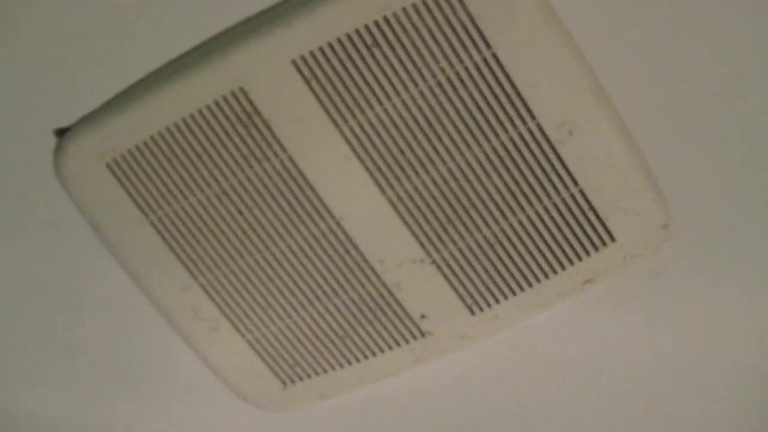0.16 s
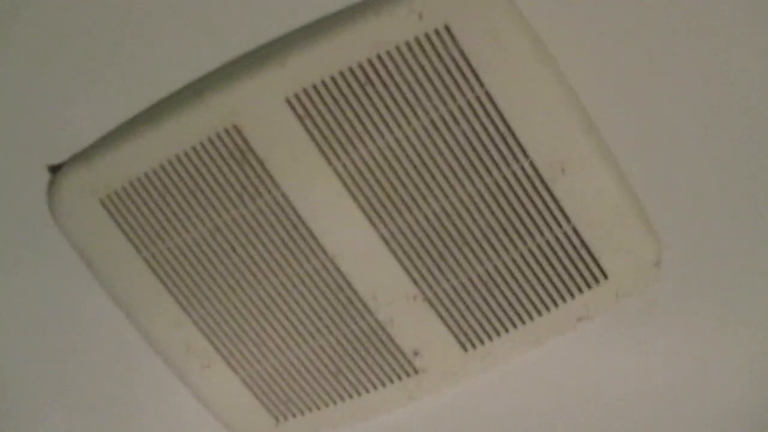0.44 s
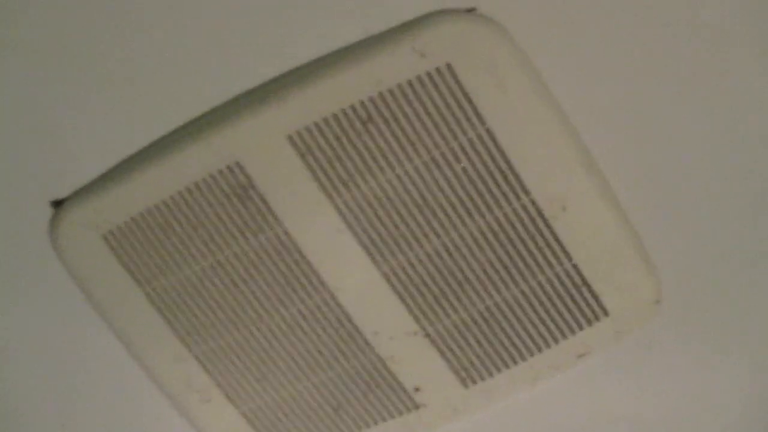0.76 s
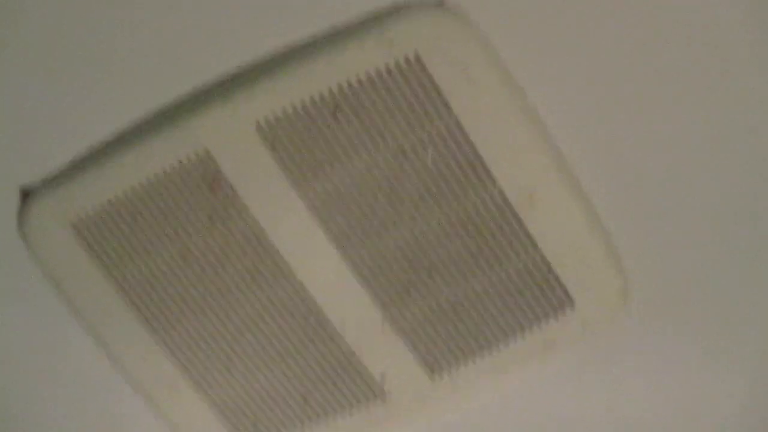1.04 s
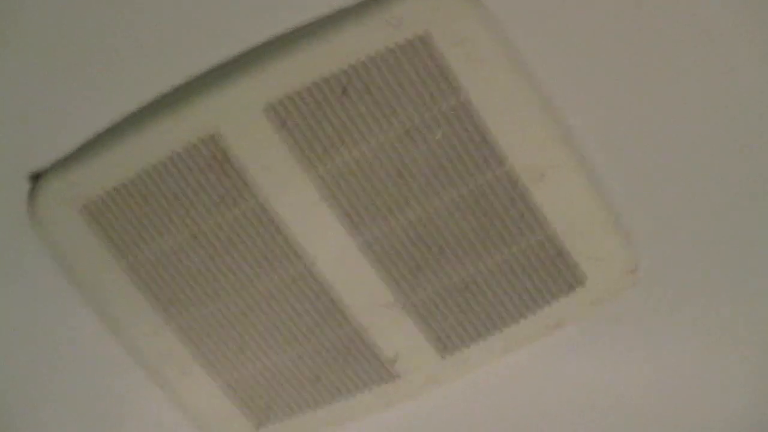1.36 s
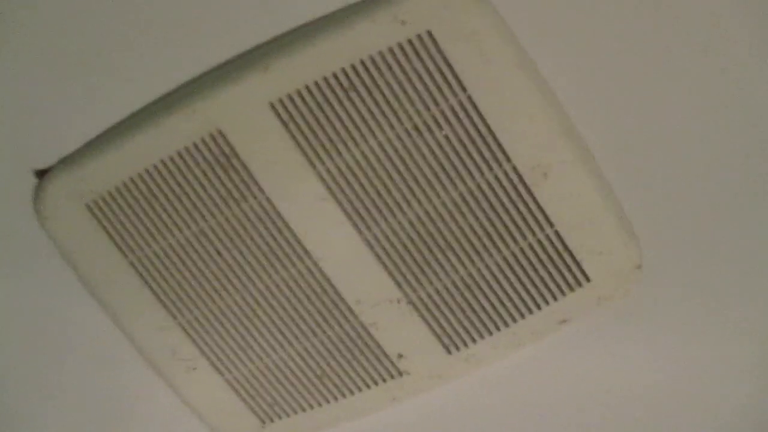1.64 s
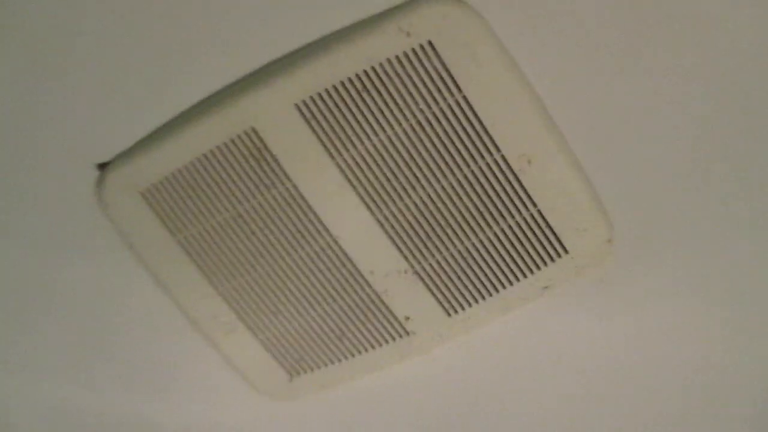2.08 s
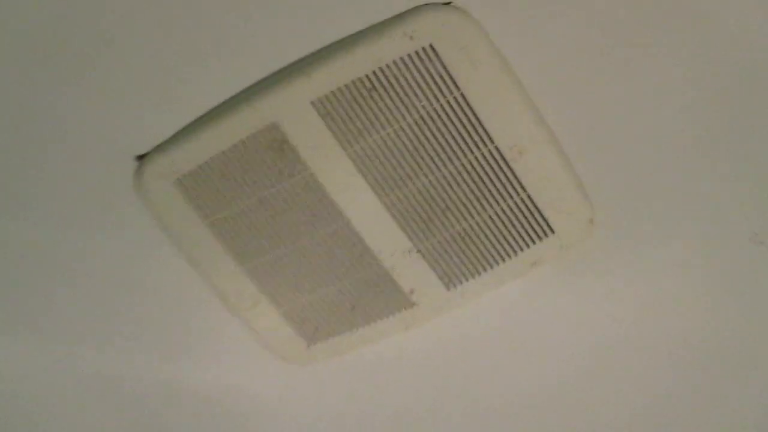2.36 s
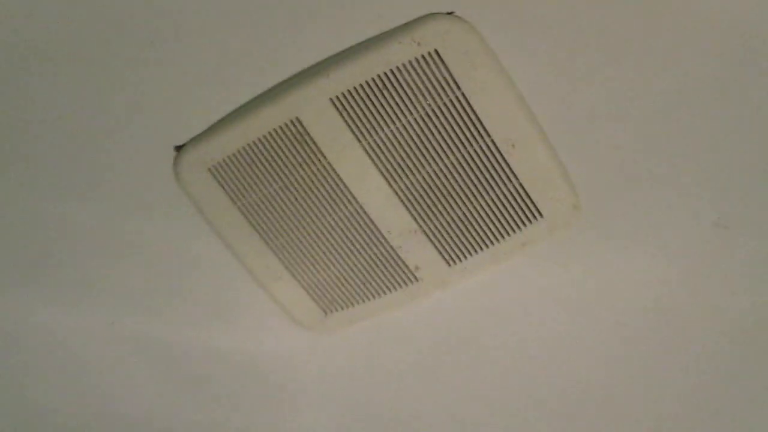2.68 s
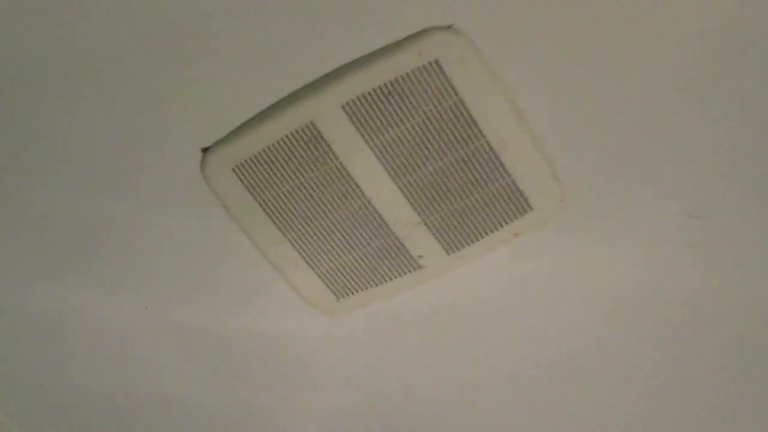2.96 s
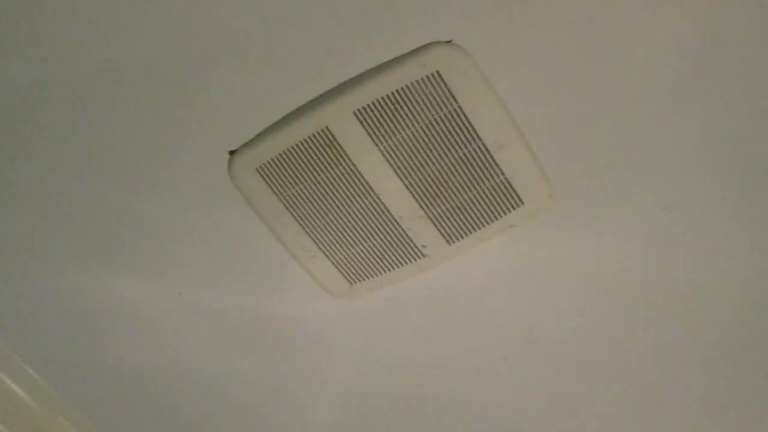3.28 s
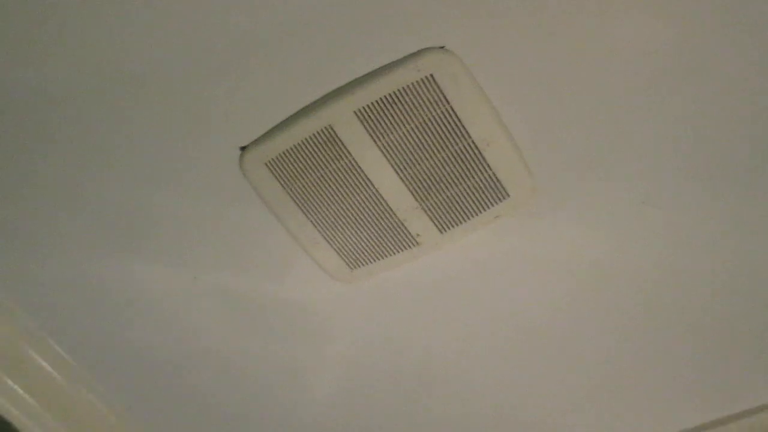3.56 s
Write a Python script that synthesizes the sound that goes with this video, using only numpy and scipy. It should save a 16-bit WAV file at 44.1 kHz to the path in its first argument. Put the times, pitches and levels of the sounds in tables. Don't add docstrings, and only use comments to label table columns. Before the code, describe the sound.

Constant motor hum with a buzzing housing and turbulent air through a grille, heard on a handheld camera; a loud close click early on, small grip ticks, then slightly duller air as the hand shifts.

```python
import sys
import numpy as np
from scipy import signal
from scipy.fft import rfft, irfft, next_fast_len
from scipy.io import wavfile
from scipy.ndimage import uniform_filter1d, map_coordinates

SR = 44100
rng = np.random.default_rng(int(sys.argv[2]) if len(sys.argv) > 2 else 0)


def invert_db(level):
    return 10 ** (np.asarray(level, dtype=float) / 20)


def pcm_store(signal):
    levels = np.round(np.clip(np.atleast_2d(signal), -1, 1) * 32767)
    wavfile.write(sys.argv[1], SR, levels.astype(np.int16).T)


N = 164052


def unit(x):
    return x / np.sqrt(np.mean(x ** 2) + 1e-20)


def along(points, hz):
    f, v = np.transpose(points)
    return np.interp(np.log(hz + 1), np.log(f + 1), v)


def lifts(peaks, hz):
    return sum(db / (1 + (2 * (hz - centre) / width) ** 2) for centre, width, db in peaks)


def wobble(rate):
    knots = rng.standard_normal(int(N * rate / SR) + 4)
    return map_coordinates(knots, [np.arange(N) * rate / SR])


def filtered(x, response):
    m = next_fast_len(N + SR // 2)
    return irfft(rfft(x, m) * response(np.fft.rfftfreq(m, 1 / SR)), m)[..., :N]


def band(centre_hz, spread):
    def bell(hz):
        return np.exp(-(np.log2((hz + 1) / centre_hz) / spread) ** 2)
    return unit(filtered(rng.standard_normal(N), bell))


def patchy(x, db, size, across, along_time):
    z = signal.stft(x, nperseg=size)[2]
    field = uniform_filter1d(rng.standard_normal(z.shape), size=across, axis=0)
    field = uniform_filter1d(field, size=along_time, axis=1)
    return signal.istft(z * invert_db(db * unit(field)), nperseg=size)[1][:N]


# frequency in Hz, density in dB per Hz.
AIR_SPECTRUM = [(45, -22), (70, -6.5), (200, -4), (700, -4.5), (1500, -16), (2700, -26.5), (8000, -32.5),
                (13500, -40.5), (15700, -49)]
# centre in Hz, width in Hz, lift in dB.
DUCT_RESONANCES = [(386, 10, 9.5), (535, 17.4, 6), (603, 24, -6), (712, 13.3, 5), (896, 24, 1),
                   (1167, 110, 3.5), (1615, 25, 6), (2006, 170, 4.5), (455, 56, -7.5)]
# centre in Hz, width in Hz, lift in dB.
OPEN_HAND = [(1370, 1500, 2), (2420, 1000, 4.5), (3350, 130, 7.5), (3560, 200, 8), (3880, 130, 11.5),
             (4200, 270, 0), (4700, 190, 10), (4956, 150, 11.5), (5440, 720, 5), (6110, 80, 9),
             (6630, 40, 9), (7100, 400, 7), (9300, 360, 1), (11060, 110, 8)]
# centre in Hz, width in Hz, lift in dB.
SHADED_HAND = [(3360, 100, 1.5), (4100, 150, 9), (4740, 220, 11), (5700, 600, -1), (6130, 100, 4),
               (7100, 340, 4.5), (8940, 300, 5), (9500, 200, 4), (10950, 150, 3), (12950, 200, -7)]
# centre in Hz, width in Hz, lift in dB.
LOWERED_CAMERA = [(3400, 89, -1), (3680, 60, 3), (4100, 250, 2), (4940, 280, 5), (6150, 150, 3),
                  (6910, 440, 4), (8960, 300, 4.5), (10400, 100, 8), (12980, 150, 4), (13700, 300, -5)]


def air():
    level_db = -26
    slip_hz, slip_db, slip_peak_s = 6.3, 0.48, .02
    room_ripple_db = 2.5
    flutter_db, flutter_from_hz = 1.5, 13000
    shade_s, shade_takes_s = 1.397, .02
    lower_s, lower_takes_s = 2.05, 0.66
    t = np.arange(N) / SR

    flow = patchy(rng.standard_normal(N), 1.2, size=256, across=8, along_time=5)
    flow = patchy(flow, room_ripple_db, size=8192, across=2, along_time=16)
    throb_db = slip_db * np.cos(2 * np.pi * slip_hz * (t - slip_peak_s))
    flow = flow * invert_db(throb_db + 0.37 * wobble(40.) + 0.23 * wobble(11.0))

    top = filtered(flow, lambda hz: 1 / (1 + (flutter_from_hz / (hz + 1)) ** 4))
    flutter = wobble(29.98) + 0.38 * wobble(7.97)
    flow = flow + top * (invert_db(flutter_db * flutter) - 1)

    ducted = filtered(flow, lambda hz: invert_db(along(AIR_SPECTRUM, hz) + lifts(DUCT_RESONANCES, hz)))
    ducted = invert_db(level_db) * unit(ducted)

    opened = filtered(ducted, lambda hz: invert_db(lifts(OPEN_HAND, hz)))
    shaded = filtered(ducted, lambda hz: invert_db(lifts(SHADED_HAND, hz)))
    lowered = filtered(ducted, lambda hz: invert_db(lifts(LOWERED_CAMERA, hz)))
    shade = np.clip((t - shade_s) / shade_takes_s + .5, 0, 1)
    low = np.clip((t - lower_s) / lower_takes_s + .5, 0, 1)
    return (1 - shade) * opened + shade * ((1 - low) * shaded + low * lowered)


# start in seconds, length in seconds, level in dB, centre in Hz.
RUB_EVENTS = [
    (1.307, 0.11, -39.5, 4200),
]


def rubs():
    t = np.arange(N) / SR
    out = np.zeros(N)
    for start, length, db, hz in RUB_EVENTS:
        stroke = np.sin(np.pi * np.clip((t - start) / length, 0, 1))
        out = out + invert_db(db) * band(hz, 0.19) * stroke
    return out


# frequency in Hz, density in dB per Hz.
SCRAPE_SPECTRUM = [(710, -25), (1300, -5), (2300, -3), (3500, -2), (5200, -14), (7500, -12), (10000, -14),
                   (15500, -40)]


def scrape():
    start_s, length_s, level_db = 1.2415, 0.0093, -17.5
    t = np.arange(N) / SR
    gate = np.clip(np.minimum(t - start_s, start_s + length_s - t) / 0.001, 0, 1)
    grain = unit(filtered(rng.standard_normal(N), lambda hz: invert_db(along(SCRAPE_SPECTRUM, hz))))
    return invert_db(level_db + 1.1 * wobble(900.)) * gate * grain


# start in seconds, peak level in dB, centre in Hz, spread in octaves,
# 60 dB decay time in seconds.
TICK_EVENTS = [
    (1.102, -24, 3800, 1.3, .015),
    (1.1012, -32, 11000, 0.55, .006),
    (1.536, -32, 8500, .4, .006),
    (1.5815, -28, 2850, .4, 0.016),
    (1.585, -23, 1700, .7, .018),
    (1.614, -36, 6000, .8, .008),
    (1.2504, -8.5, 2600, 1.13, .014),
    (1.25, -20.5, 9000, .6, 0.0035),
]


def ticks():
    t = np.arange(N) / SR
    out = np.zeros(N)
    for start, db, hz, spread, t60 in TICK_EVENTS:
        since = np.maximum(t - start, 0)
        out = out + invert_db(db - 60 * since / t60) * (t > start) * band(hz, spread)
    return out


def snap():
    start_s, level_db, ring_hz, t60_s = 1.2505, -3, 3800, .006
    since = np.maximum(np.arange(N) / SR - start_s, 0)
    return invert_db(level_db - 60 * since / t60_s) * np.sin(2 * np.pi * ring_hz * since)


# multiple of the buzz fundamental, level in dB rms.
BUZZ_HARMONICS = [(5, -34.4), (6, -35.0), (8, -14.6), (9, -40.8), (10, -40.9), (11, -28.4), (12, -36.6),
                  (13, -30.7), (14, -30.2), (16, -41.5), (18, -39.1), (19, -43.0), (20, -46.8), (21, -45.6),
                  (22, -39.2), (24, -36.8), (26, -28.6), (30, -45.5), (32, -46.8), (34, -46.2), (35, -38.6),
                  (40, -38.6), (43, -42.6), (48, -42.2)]
# frequency in Hz, level in dB rms.
ROTOR_TONES = [(144.5, -41), (215.45, -34.5), (264.4, -41), (384.35, -37), (534.4, -41), (620.2, -44),
               (669.1, -45), (714.2, -39), (729.4, -44), (740.1, -45), (909.8, -47), (1200, -48),
               (1572, -50)]


def motor():
    buzz_hz = 14.996
    beat_s = 3.07
    rotor_wander_db = 1
    t = np.arange(N) / SR - beat_s

    turn = rng.random(110)
    turn[5] = 2 * turn[8] - turn[11] + .23
    turn[6] = 2 * turn[8] - turn[10] + .38

    def tone(hz, db):
        phase = hz * t + turn[round(hz / buzz_hz)]
        return np.sqrt(2) * invert_db(db) * np.cos(2 * np.pi * phase)

    buzz = sum(tone(k * buzz_hz, db) for k, db in BUZZ_HARMONICS)
    rotor = sum(tone(hz, db + rotor_wander_db * wobble(2.57)) for hz, db in ROTOR_TONES)
    return buzz + rotor


def scene():
    hand = rubs() + scrape() + ticks() + snap()
    return (air() + hand + motor())[None]


def top_cut(x):
    return signal.sosfilt(signal.butter(12, 15710, fs=SR, output="sos"), x)


def record(dry):
    duck_s, duck_db, attack_s, recover_s = 1.251, 5, 0.0018, 1.25
    since = np.arange(N) / SR - duck_s
    attack = np.clip(since / attack_s, 0, 1)
    recovery = np.clip(1 - since / recover_s, 0, 1)
    mix = np.clip(dry * invert_db(-duck_db * attack * recovery), -.97, .97)
    return top_cut(mix)


dry = scene()
out = record(dry)
pcm_store(out)
```